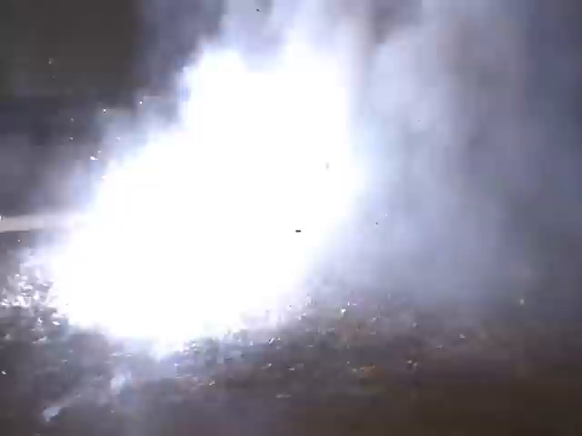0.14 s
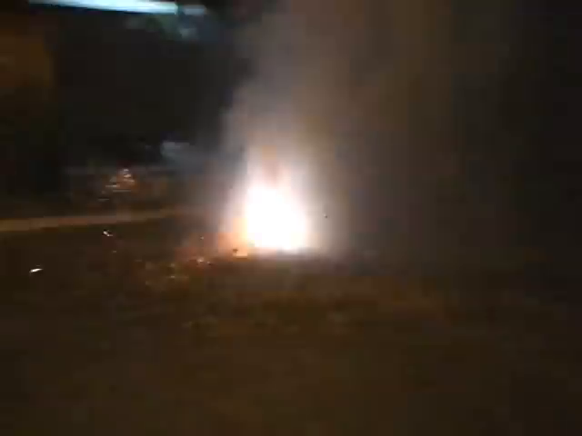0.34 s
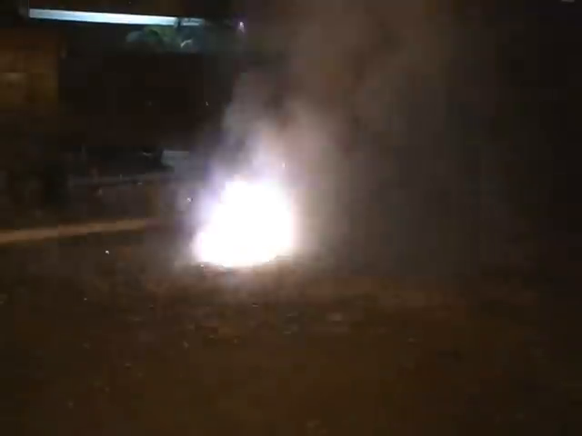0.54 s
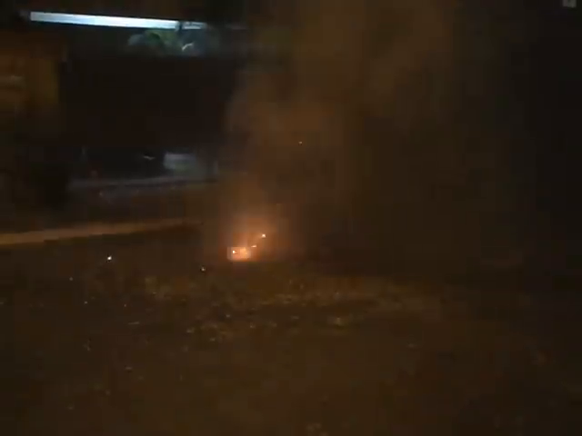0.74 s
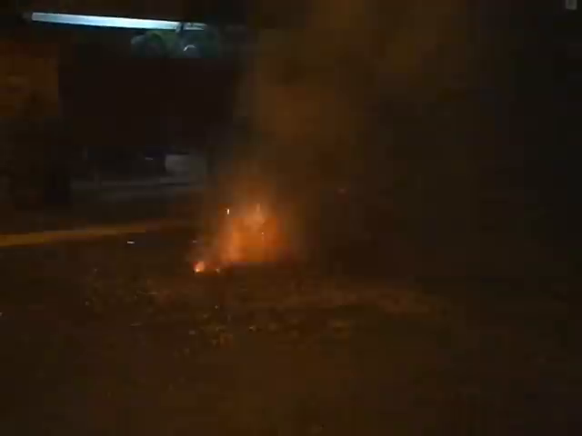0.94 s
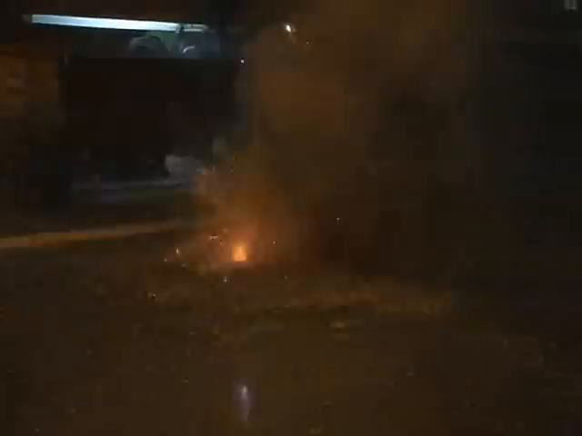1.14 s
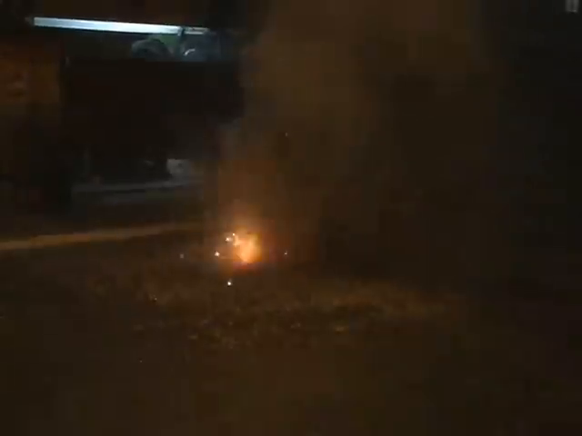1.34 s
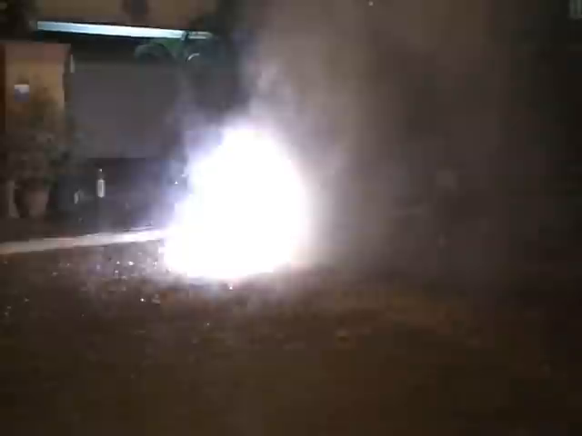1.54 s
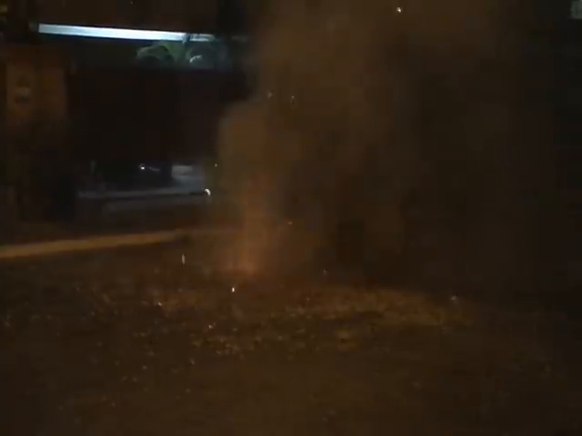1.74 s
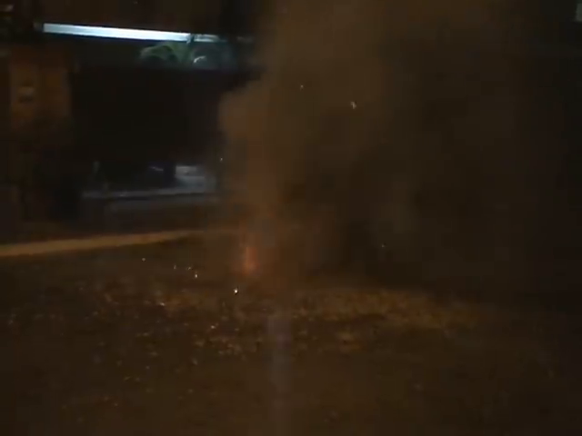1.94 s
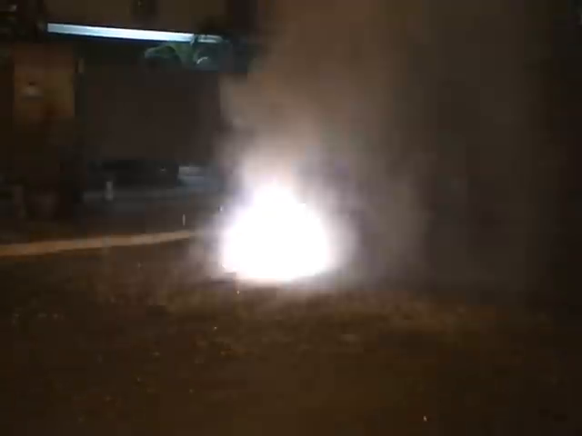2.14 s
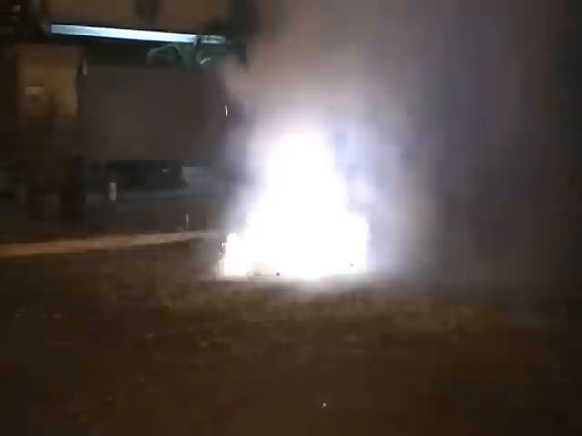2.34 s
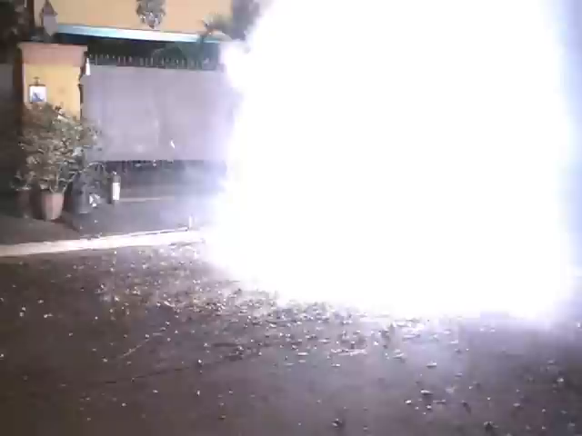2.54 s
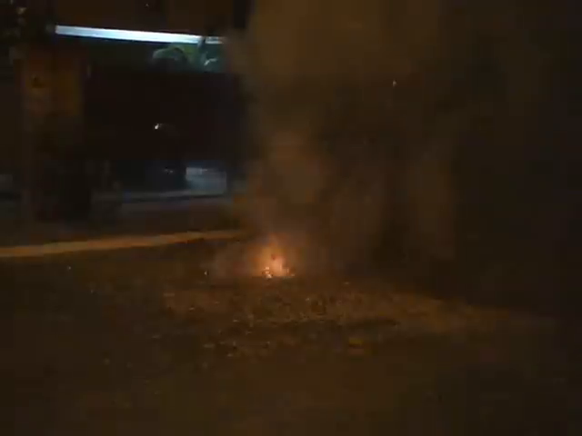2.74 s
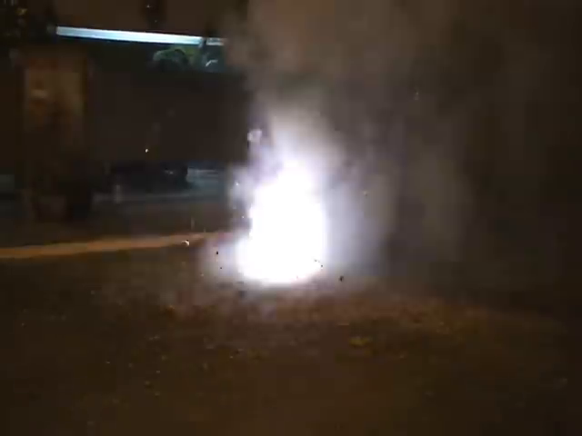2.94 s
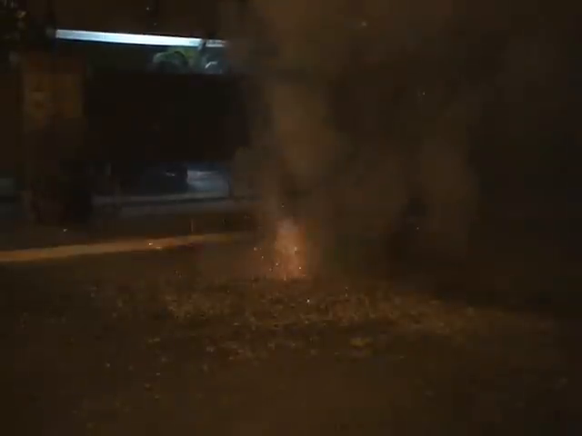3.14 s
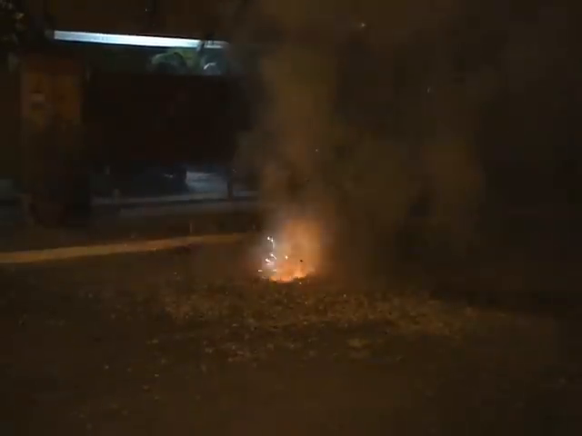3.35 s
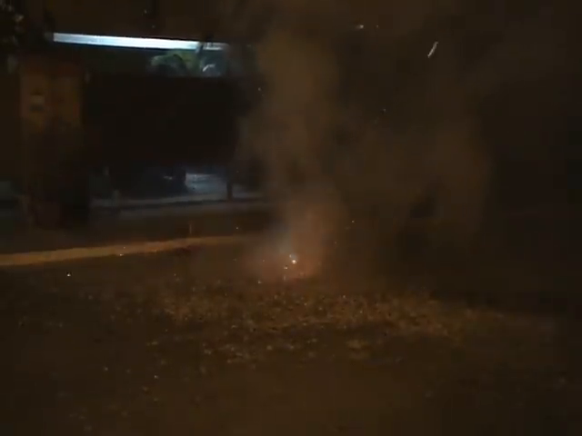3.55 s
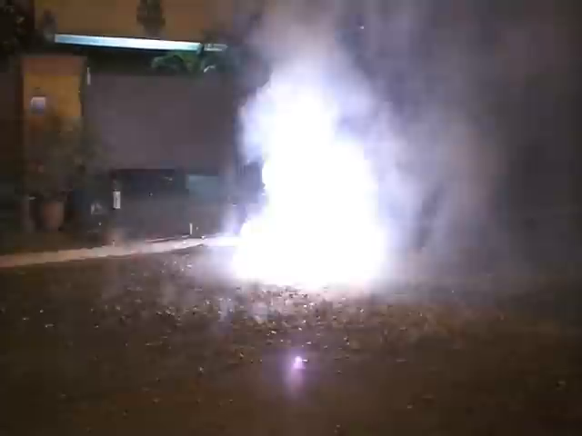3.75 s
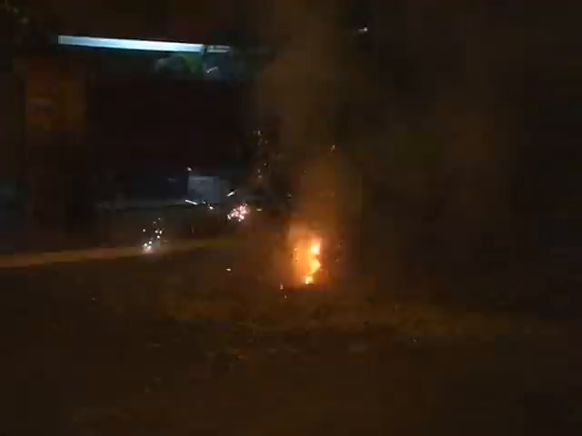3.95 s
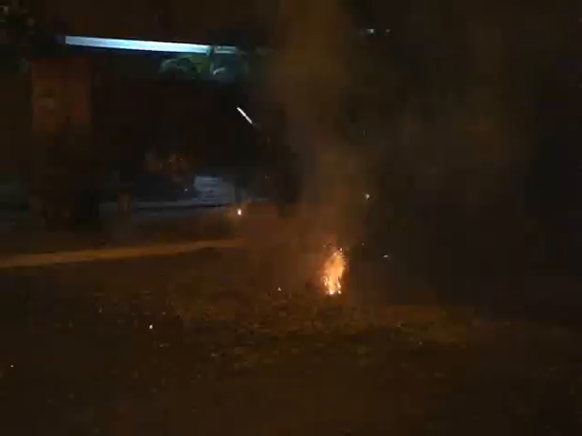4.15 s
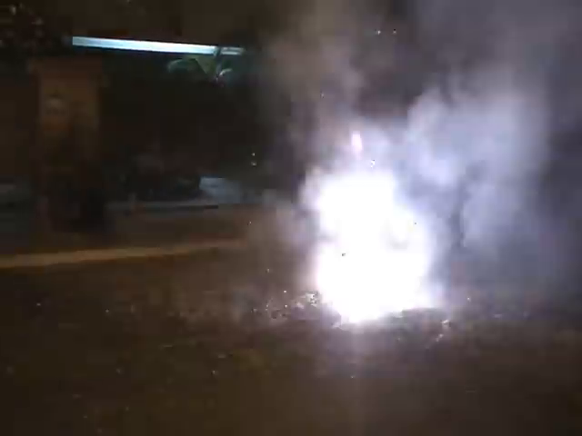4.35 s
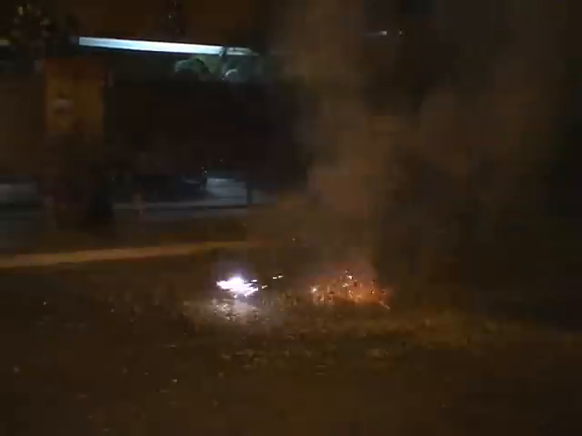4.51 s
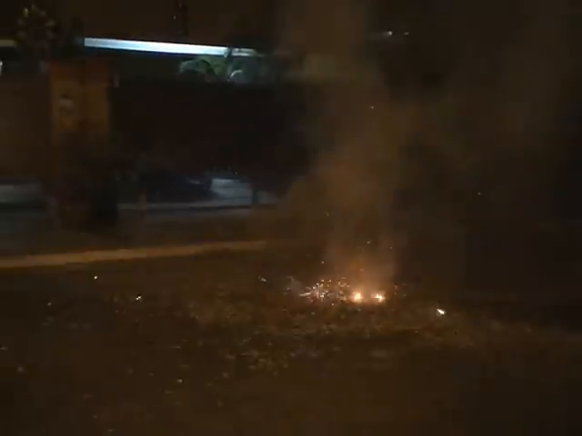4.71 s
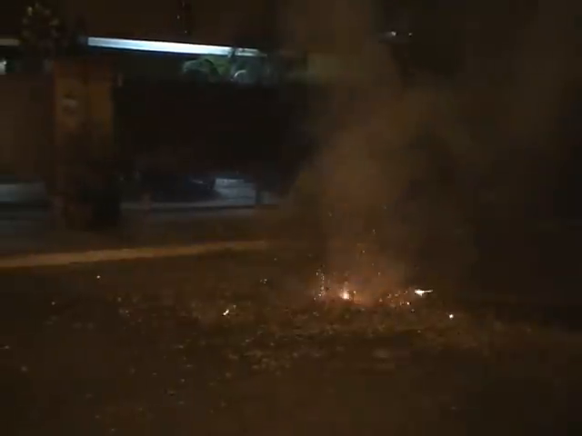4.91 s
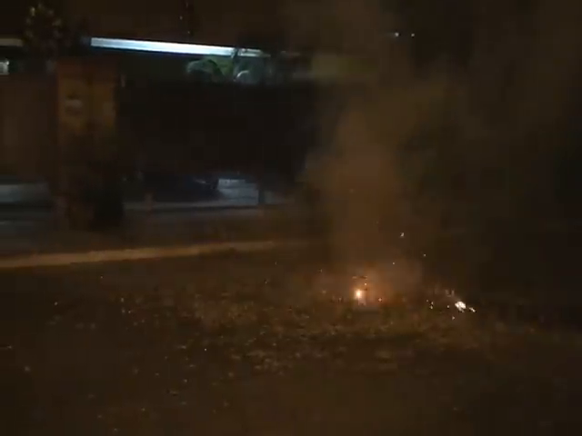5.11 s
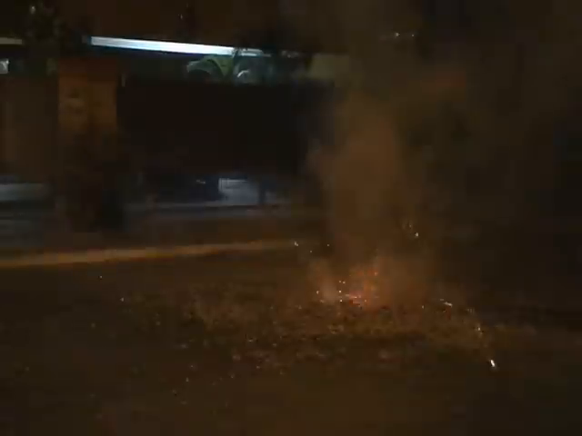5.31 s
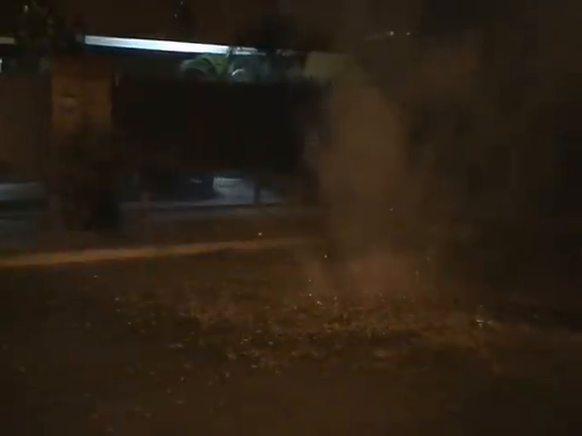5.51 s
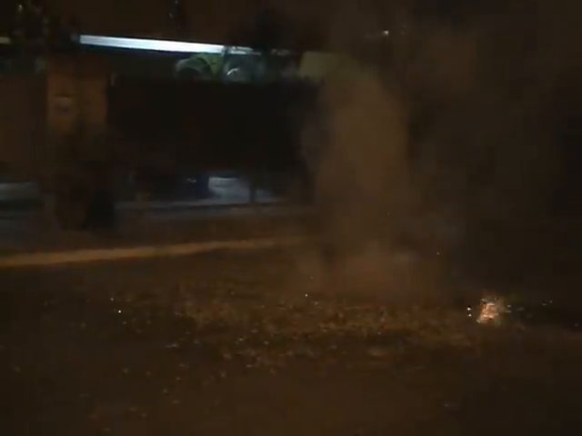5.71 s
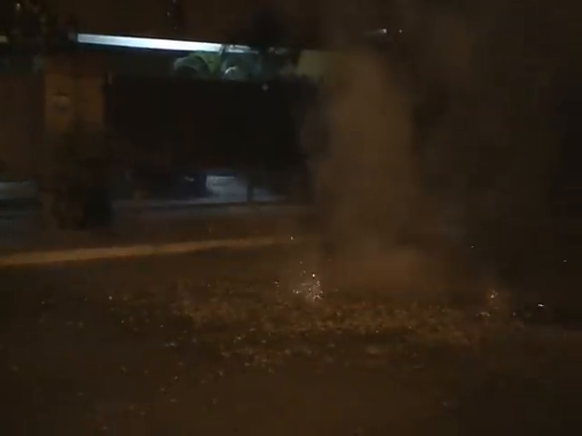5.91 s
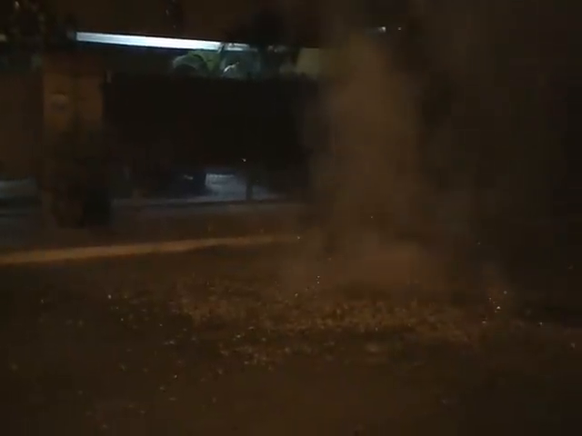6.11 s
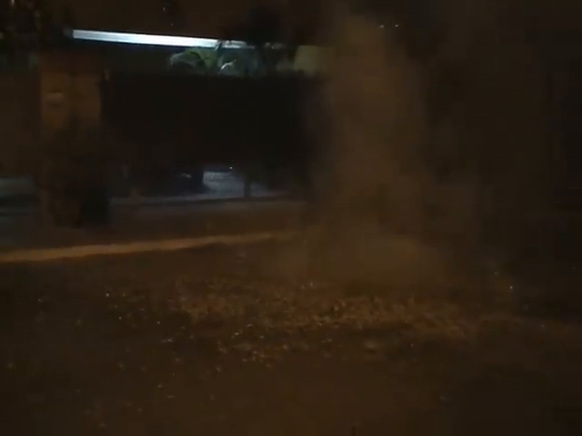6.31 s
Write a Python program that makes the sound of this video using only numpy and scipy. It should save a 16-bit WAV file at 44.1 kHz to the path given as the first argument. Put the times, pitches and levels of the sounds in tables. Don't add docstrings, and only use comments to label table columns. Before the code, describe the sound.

A dense barrage of firecrackers a few metres away, starting abruptly at full force. Uneven bangs, some crisp and bright, others dull and thumpy, tumble over each other many times a second. Hard wall echoes fill the outdoor yard, and the overdriven stereo microphones clip it all to a crunchy roar. Short pauses expose fading echoes; a faint town hum lies buried beneath.

```python
import sys
import numpy as np
from scipy import signal
from scipy.fft import rfft, irfft, next_fast_len
from scipy.io import wavfile
from scipy.ndimage import uniform_filter1d

SR = 44100
rng = np.random.default_rng(int(sys.argv[2]) if len(sys.argv) > 2 else 0)


def unload_wav(signal):
    wavfile.write(
        sys.argv[1],
        SR,
        np.round(np.clip(np.atleast_2d(signal).T, -1, 1) * 32767).astype(np.int16),
    )


def gain_from_db(level_db):
    decades = np.asarray(level_db, float) / 20
    return 10 ** decades


N = 280915


# [start t/s, length t/s, first bang level/dB, its thump level/dB, last bang level/dB]
VOLLEYS = [(.0004, 0.16, -9, -3, -12), (0.2384, 0.12, -8.5, -5, -13.5), (.4312, 0.41, -6.5, 5, -8),
           (0.929, 0.37, -6, 10, -7.5), (1.4069, 0.039, -8, 5, -9.5), (1.586, 0.028, -8.5, 6, -14),
           (1.6723, 0.092, -12, 8, -9), (1.913, .024, -17, 10, -32), (2.1056, 0.13, -7, 7, -14),
           (2.289, 0.35, -10, -7, -10.5), (2.6963, 0.42, -13, -15, -8.5), (3.39, 0.18, -12, 8, -20),
           (3.7153, 0.033, -8.5, 5, -17), (3.817, 0.55, -8, 11, -16), (4.504, .276, -10.5, 12, -14.5),
           (4.835, 0.047, -10, 1, -12.5), (4.942, 0.069, -11.5, 8, -14), (5.1066, 0.089, -8, 8, -20),
           (5.2757, 0.2, -8, 5, -16.5), (5.8371, 0.057, -8.5, 0.5, -9), (5.9753, .061, -10.5, 12, -15)]
# [t/s, level/dB, thump level/dB, treble tilt/dB per octave]
ACCENTS = [(.0125, -9.5, 8, -1), (.0498, -14, 7, 1.8), (.0962, -6.5, -2, 0.2), (.2853, -7.5, 2, 0),
           (.6693, -9, -24, -0.5), (.7552, -9.5, 4, -0.5), (.9848, -8, 14, 1.7), (1.158, -8, 2, .6),
           (1.512, -18.5, 16, 1.2), (1.7163, -10, 6, 0.5), (2.3162, -8.5, -6, 0), (2.4865, -7, 4, 0.5),
           (2.735, -9.5, 5, 0.5), (2.7798, -8, 5, 0), (3.0036, -9.5, 6, 0.4), (3.1994, -24, 1, 1),
           (3.252, -12.5, 10, -0.5), (3.27, -20.5, 3, -2), (3.4302, -6, 7, 0), (3.9704, -9, -3, 1),
           (4.18, -8, 4, .3), (4.3244, -8.5, 2, -0.4), (4.579, -17, 9, 2), (4.6054, -11, 14, 1),
           (4.687, -6.5, 7, 0), (4.9682, -7.5, -4, -1), (5.149, -11, -4, -0.9), (1.445, -16, 12, 0),
           (5.3787, -8.5, -1, -1.5)]


def cracker_string(fuse_s=0.058, unevenness=0.3, clear_s=0.03, tilt_per_thump=0.036):
    bangs = list(ACCENTS)
    chances = rng.standard_normal((len(VOLLEYS), 12, 3)).clip(-2, 2)
    for (start, length, first_db, first_thump_db, last_db), chance in zip(VOLLEYS, chances):
        bangs.append((start, first_db, first_thump_db, tilt_per_thump * first_thump_db))
        bangs.append((start + length, last_db, -6, -0.77))
        waits = max(round(length / fuse_s), 1)
        for k, (late, loud, deep) in enumerate(chance[:waits - 1]):
            s = start + (k + 1 + 0.5 * unevenness * late) * length / waits
            level_db = -7.5 + 1 * loud
            thump_db = -1 + 4.5 * deep
            if min(abs(s - accent[0]) for accent in ACCENTS) > clear_s:
                bangs.append((s, level_db, thump_db, tilt_per_thump * thump_db))
    s, level_db, thump_db, tilt = np.transpose(bangs)
    left_over_right_db = 3.5 + 0.18 * level_db
    size = gain_from_db(6.5 + level_db + np.outer([0.5, -0.5], left_over_right_db))
    return s, size, tilt, thump_db


def train(s, heights):
    line = np.zeros((2, N))
    at = np.round(s * SR).astype(int).clip(0)
    np.add.at(line, (slice(None), at), heights)
    return line


# [delay t/s, level/dB]
SLAPS = [
    (.0012, -4),
    (.0046, -13.5),
    (.0093, -14.5),
    (0.0156, -6),
    (.024, -14),
]


def blasts(s, size, push_s=0.00056, body_hz=620, body_t60=0.0059, body_db=-2.5):
    t = np.arange(1500) / SR
    wave = (1 - t / push_s) * np.exp(-t / push_s)
    wave += gain_from_db(body_db - 60 * t / body_t60) * np.sin(2 * np.pi * body_hz * t)
    shot = wave.copy()
    for delay_s, db in SLAPS:
        lag = round(delay_s * SR)
        shot[lag:] += gain_from_db(db) * wave[:-lag]
    return gain_from_db(11) * signal.oaconvolve(train(s, size), shot[None], axes=1)[:, :N]


def thumps(s, size, thump_db, swing_hz=60, swing_t60=0.055):
    t = np.arange(6000) / SR
    swing = np.sin(2 * np.pi * swing_hz * t) * gain_from_db(-60 * t / swing_t60)
    return gain_from_db(-13) * signal.oaconvolve(train(s, size * gain_from_db(thump_db)), swing[None], axes=1)[:, :N]


def dying(energy, t60):
    return signal.lfilter([1], [1, -np.exp(-np.log(1e6) / (t60 * SR))], energy)


def read(points, hz):
    f, value = np.transpose(points)
    return np.interp(np.log(hz + 1), np.log(f + 1), value)


# [f/Hz, likeness 0 to 1]
LIKENESS = [(60, 0.92), (300, 0.96), (800, 0.94), (1650, .86), (3000, 0.71), (5000, 0.75), (9000, 0.86),
            (15000, 0.82)]


def stereo_spectrum(colour):
    size = next_fast_len(N)
    hz = np.fft.rfftfreq(size, 1 / SR)
    a, b = rfft(rng.standard_normal((2, size)))
    likeness = np.clip(read(LIKENESS, hz), 0, 1)
    shared, private = np.sqrt(1 + likeness) * a, np.sqrt(1 - likeness) * b
    gain = gain_from_db(read(colour, hz))
    pair = np.array([shared + private, shared - private])
    return hz, pair * gain / np.sqrt(2 * np.mean(gain ** 2))


# [f/Hz, t60 t/s, build-up t/s, early boom from the near walls level/dB]
YARD = [(70, 0.46, 0.0047, 3), (248, 0.54, 0.0051, -0.5), (614, 0.63, 0.0045, -8.5),
        (1200, 0.68, 0.0025, -12), (2480, 0.69, 0.0012, -31), (4800, 0.59, 0.00035, -55),
        (11000, 0.5, 0.00036, -8)]
# [f/Hz, level/dB per Hz]
ECHO_COLOUR = [(24, -43), (45, -15), (140, -15), (300, -8), (600, -4), (900, -2.5), (1300, -4.5),
               (1750, -7.5), (2200, -12), (5860, -20.5), (15500, -28.5)]


def echoes(s, size, tilt, thump_db, early_t60=0.054, lumpy_db=0.55, lump_size=400):
    hz, pair = stereo_spectrum(ECHO_COLOUR)
    centres = np.log([row[0] for row in YARD])
    out = np.zeros((2, N))
    lumps = uniform_filter1d(rng.standard_normal(N), lump_size) * np.sqrt(lump_size)
    for k, (centre_hz, t60, rise_s, early_db) in enumerate(YARD):
        share = np.interp(np.log(hz + 1), centres, np.arange(len(YARD)) == k)
        band = irfft(pair * share)[:, :N]
        bass_db = thump_db * np.exp(-centre_hz / 600)
        tilt_db = tilt * np.log2(centre_hz / 1000)
        fed = train(s, (size * gain_from_db(tilt_db + bass_db)) ** 2)
        energy = dying(fed, t60) + gain_from_db(early_db) ** 2 * dying(fed, early_t60)
        smooth = np.exp(-1 / (rise_s * SR))
        out += band * np.sqrt(signal.lfilter([1 - smooth], [1, -smooth], energy))
    return out * gain_from_db(lumpy_db * lumps)


# [f/Hz, level/dB per Hz]
TOWN_HUM = [(40, -9), (150, 6), (500, 4), (1100, 4), (1900, -8), (2500, -9), (7000, -24), (15500, -30)]


def night():
    _, hum = stereo_spectrum(TOWN_HUM)
    return gain_from_db(-36) * irfft(hum)[:, :N]


def scene():
    s, size, tilt, thump_db = cracker_string()
    close = blasts(s, size) + thumps(s, size, thump_db)
    return close + echoes(s, size, tilt, thump_db) + night()


# [f/Hz, level/dB]
PORTS = [(60, -0.3), (300, -1.5), (1000, -1.5), (2000, -0.8), (4500, -0.1), (8000, -1), (15000, -2)]


def through_ports(pair):
    lean_db = read(PORTS, np.fft.rfftfreq(2 * N, 1 / SR))
    return irfft(rfft(pair, 2 * N) * gain_from_db(np.outer([0.5, -0.5], lean_db)))[:, :N]


def roll_off(x):
    return signal.sosfilt(signal.butter(12, 15720, fs=SR, output="sos"), x)


def record(dry):
    ceiling = gain_from_db(np.array([[-3.8], [-4.3]]) + 0.28 * np.sign(dry))
    knee = 4.5
    squashed = dry / (1 + abs(dry / ceiling) ** knee) ** (1 / knee)
    thin = squashed
    for cut_hz in (140, 30):
        thin = signal.sosfilt(signal.butter(1, cut_hz, "high", fs=SR, output="sos"), thin)
    soft = signal.sosfilt(signal.butter(1, 11000, fs=SR, output="sos"), thin)
    wide = soft - 0.26 * (soft[::-1] - soft)
    return roll_off(through_ports(wide))


dry = scene()
out = record(dry)
unload_wav(out)
```